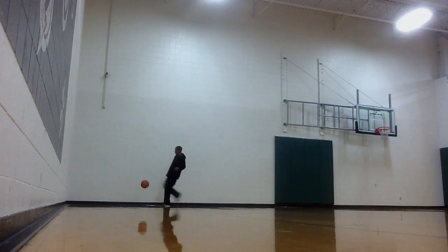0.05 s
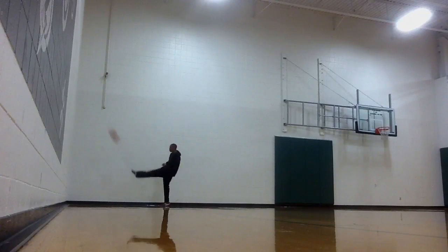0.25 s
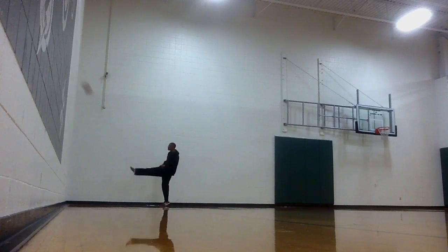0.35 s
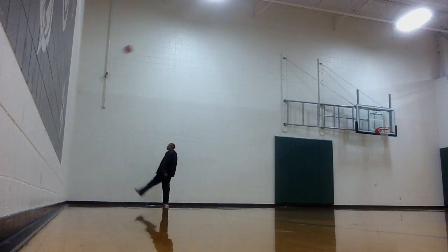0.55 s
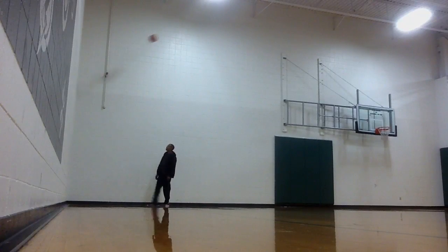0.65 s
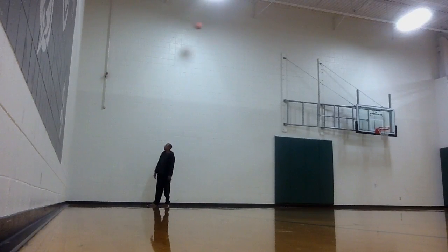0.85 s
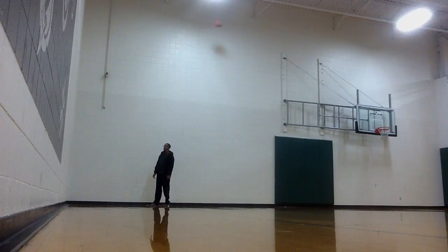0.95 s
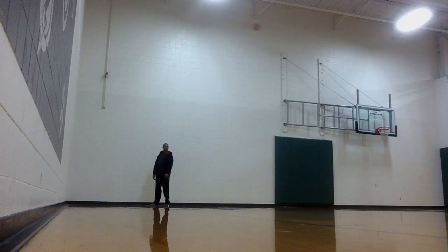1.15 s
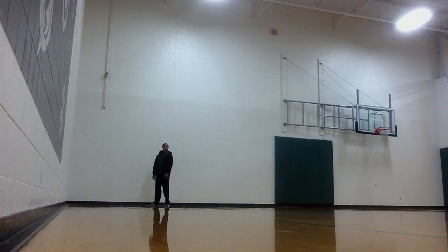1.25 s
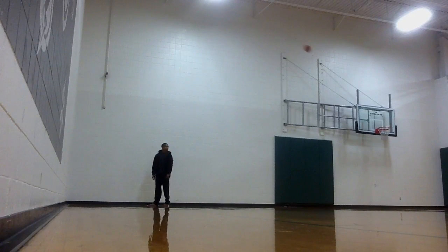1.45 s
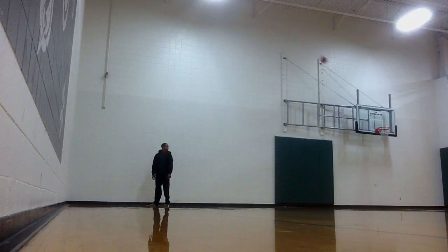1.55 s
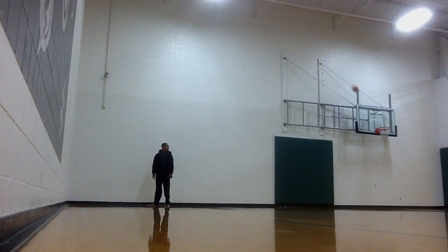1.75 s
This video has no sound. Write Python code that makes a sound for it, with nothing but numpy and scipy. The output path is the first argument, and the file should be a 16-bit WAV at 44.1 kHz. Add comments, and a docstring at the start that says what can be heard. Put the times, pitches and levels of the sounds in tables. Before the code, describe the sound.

A kicked ball thuds and rebounds around a large gym, each hit reverberating.

```python
"""A big, hard gym: a ball is kicked, slaps the side wall, clinks on metal high up, lands a distant blow.
Each blow is a crack and a low thump, with the ball's skin and air ringing.
Nearby walls echo it; the hall reverberates for seconds.
Underneath: ventilation and the dying wash of an earlier bounce."""
import sys
import numpy as np
from scipy import signal
from scipy.fft import rfft, irfft, next_fast_len
from scipy.io import wavfile
from scipy.ndimage import map_coordinates

SR = 44100
rng = np.random.default_rng(int(sys.argv[2]) if len(sys.argv) > 2 else 0)


def log_audio(samples):
    """Write samples as a 16-bit WAV file to the path given in sys.argv[1]."""
    # one column per channel
    frames = np.atleast_2d(samples).T
    # limit to full scale, then quantise
    limited = np.clip(frames, -1, 1)
    pcm = np.round(limited * 32767).astype(np.int16)
    wavfile.write(sys.argv[1], SR, pcm)


N = 79380
T = np.arange(N) / SR
FFT_SIZE = next_fast_len(2 * N)
HZ = np.fft.rfftfreq(FFT_SIZE, 1 / SR)

# hall decay (frequency [Hz], T60 [s])
HALL_T60 = [(80, 3.53), (200, 3.13), (550, 1.92), (1200, 2.77), (2500, 1.785), (4000, 1.383), (6500, 0.8),
            (10000, 0.52), (15000, 0.38)]
# back wall reflection (frequency [Hz], gain [dB])
BACK_WALL_GAIN = [(150, 3), (1500, -2), (3000, 0.5), (6000, -12), (15000, -5)]
# background spectra (frequency [Hz], relative level [dB])
VENT_SPECTRUM = [(25, -40), (50, -47), (110, 2), (200, 5.5), (500, -13.5), (1500, -19), (4000, -32),
                 (7000, -40), (15000, -41)]
WASH_SPECTRUM = [(40, -33), (75, -8), (125, 4), (190, 3), (400, -13), (600, -22.5), (1100, -19.5),
                 (2500, -16), (4200, -15.5), (6500, -17.5), (15000, -51)]
# modes of metal fitting, shoe knock, ball skin and air (frequency [Hz], level [dB], T60 [s])
METAL_MODES = [(3610, -4, 0.17), (3736, -12, 0.04), (3926, -0.5, 0.19), (4050, -1.5, 0.21),
               (4320, -0.5, 0.063), (4370, -14, .16), (4480, -6, 0.12), (4770, -3.5, 0.08),
               (4840, -3, 0.05)]
SHOE_MODES = [(1110, 9, 0.042), (3210, 1, 0.045), (4180, -2, 0.034), (4540, 2, 0.042)]
BALL_MODES = [(405, -5, 0.036), (657, -7, 0.068), (793, -1.5, 0.068), (955, 2, 0.06), (1125, -1, 0.05),
              (1268, -5, 0.055), (1590, -11, 0.055), (1730, -13, 0.05), (2640, -22, 0.4)]
# ball contacts (time [s], crack [dB], crack decay [s], thump [dB], thump pitch [Hz], thump delay [s],
# thump T60 [s], ring [dB], ring delay [s], scatter [dB], scatter peak [s], hall [dB], hall build-up [s])
BLOWS = [(0.2325, 2.5, 0.0013, -9, 153.5, 0.0001, 0.037, -31.5, 0.0003, -2.5, 0.0081, 9.5, 0.023),
         (0.4551, 3.5, 0.00045, -11, 180.5, 0.00797, 0.049, -24, 0.004023, 5, 0.0092, 16.5, 0.023),
         (0.7294, -8.5, 0.0015, -20, 119, 0.00075, 0.14, -46.5, 0.00179, -2.5, 0.005, 8.5, 0.0047),
         (1.385, -15.5, 0.0084, -25, 131.6, 0.03695, 0.21, -53, .004, -4, 0.02, 9, 0.05)]
# contact spectra (frequency [Hz], relative level [dB])
KICK_SPECTRUM = [(35, -51), (60, -24.5), (100, -1), (145, 6.5), (240, -5), (480, -9), (1000, -15.5),
                 (1650, -13.5), (2100, -20), (2700, -20), (3800, -29), (4800, -28), (5800, -40.5),
                 (10000, -39.5), (15000, -51)]
SLAP_SPECTRUM = [(35, -51), (65, -23), (110, 1), (170, 2.5), (260, -2), (380, -5), (530, -16), (850, -11.5),
                 (1400, -20), (2700, -16), (3550, -21.5), (4700, -18.5), (6500, -24), (11000, -28.5),
                 (15000, -35)]
CLINK_SPECTRUM = [(40, -27), (120, 1.5), (260, -0.5), (500, -12.5), (1500, -18.5), (3100, -20.5),
                  (3900, -6.5), (4600, -12.5), (5700, -20), (10000, -21), (15000, -36)]
FAR_SPECTRUM = [(40, -43), (75, -14), (135, 5), (260, -2.5), (560, -20.5), (1200, -16.5), (2600, -19),
                (4200, -24.5), (6000, -37.5), (10000, -42), (15000, -53)]
# tilt of crack and scatter against the hall (frequency [Hz], gain [dB])
KICK_TILT = [(150, -0.5), (330, 2.5), (1000, 0.5), (1650, 8.5), (2000, -8), (3200, 0.5), (4500, 6.5),
             (12000, 5)]
SLAP_TILT = [(150, -3), (450, 0.5), (1000, 3.5), (2400, 6), (3700, -3), (5000, 4.5), (12000, 8.5)]
CLINK_TILT = [(50, -19), (450, 5), (1500, -2), (4200, 0.5), (12000, 5.5)]
FAR_TILT = [(150, 6), (450, -1), (1000, -6), (2200, 2), (4500, 3.5), (12000, 3)]
# distinct reflections (delay [s], treble [dB], treble cutoff [Hz], bass [dB])
KICK_ECHOES = [(.022, -10, 12000, -6.5), (.055, -10, 1200, -17.5), (.069, -10, 7050, -36),
               (.079, -6, 2600, -9), (.112, -14, 6000, -18.5), (.152, -9.5, 1800, -8)]
SLAP_ECHOES = [(0.009, -24.5, 3000, -11.5), (.052, -17.5, 12100, -26), (.068, -8, 900, -7),
               (0.082, -11, 1000, -7), (.112, -22, 1000, -8.5), (0.149, -11.5, 5980, -17.5)]
CLINK_ECHOES = [(.0035, 5, 12000, -6), (0.026, -20, 10000, -3)]
FAR_ECHOES = [(0.022, 8, 6000, -18), (0.0525, 7, 1500, -14), (0.0687, -13, 1000, -9.5)]

NOISE_EVENNESS = 0.37
LUMPS_DB, LUMPS_RATE_HZ, LUMPS_FADE_S, LUMPS_BELOW_HZ = 5, 93, 0.27, 3700
SMEAR_PER_DELAY, SMEAR_ABOVE_HZ = 0.077, 510
BACK_WALL_DELAY_S = 0.00628
VENT_DB, WASH_DB, SHOE_DB = -42.5, 4, -34
METAL_DB, METAL_HALL_DB, METAL_STRIKE_DB, METAL_STRIKE_S = -38, 4.5, 4, 0.0028
THUMP_ATTACK_S, THUMP_HIGHPASS_HZ = 0.0024, 74
RING_ATTACK_S, RING_HIGHPASS_HZ, RING_HALL_DB = 0.0018, 298, -9
SMACK_DB, SMACK_S = 9, 0.004
BAND_LIMIT_HZ = 15450


def amp(db):
    """Decibels to gain."""
    return 10 ** (np.asarray(db) / 20)


def curve(points, hz):
    """Interpolate (frequency, value) points on a log frequency axis."""
    knots_hz, values = np.transpose(points)
    return np.interp(np.log(hz + 1), np.log(knots_hz + 1), values)


def unit_energy(x):
    """Scale to energy 1."""
    return x / np.sqrt(np.sum(x ** 2) + 1e-20)


def convolved(x, response):
    """Apply an impulse response."""
    return signal.fftconvolve(x, response)[:N]


def delayed(x, delay_s):
    """Shift later."""
    return np.pad(x, (max(round(delay_s * SR), 0), 0))[:N]


def filtered(x, cutoff_hz, kind, order=2):
    """Butterworth low-pass or high-pass."""
    return signal.lfilter(*signal.butter(order, min(cutoff_hz, SR / 2 - 1), kind, fs=SR), x)


def pulse(spectrum):
    """Minimum-phase pulse with the given spectrum."""
    cepstrum = irfft(np.log(amp(curve(spectrum, HZ))), FFT_SIZE)
    cepstrum[1:FFT_SIZE // 2] *= 2
    cepstrum[FFT_SIZE // 2 + 1:] = 0
    return irfft(np.exp(rfft(cepstrum)), FFT_SIZE)[:N]


def burst(decay_s):
    """Short noise puff, nearly flat spectrum."""
    envelope = np.exp(-T / decay_s)
    bins = rfft(rng.standard_normal(N) * envelope, FFT_SIZE)
    whitened = irfft(bins / (abs(bins) + 1e-12), FFT_SIZE)[:N]
    return unit_energy(whitened * np.sqrt(envelope))


def damped_modes(modes):
    """Decaying sines; levels vary about 1 dB per strike."""
    return sum(amp(db + rng.normal(0, 1) - 60 * T / t60_s) * np.sin(2 * np.pi * hz * T)
               for hz, db, t60_s in modes)


def even_noise(frame_samples):
    """White noise, level partly evened over time and frequency."""
    noise = rng.standard_normal(N)
    for _ in range(2):
        hz, _, bins = signal.stft(noise, SR, nperseg=frame_samples)
        evenness = NOISE_EVENNESS / (1 + hz[:, None] / 1000)
        band_mean = np.mean(abs(bins) ** (1 - evenness), axis=1, keepdims=True)
        evened = bins / (abs(bins) + 1e-12) ** evenness / band_mean
        noise = signal.istft(evened, nperseg=frame_samples)[1][:N]
    return noise / noise.std()


def ventilation():
    """Steady rumble, faint hiss."""
    white = rfft(rng.standard_normal(FFT_SIZE))
    air = irfft(white * amp(curve(VENT_SPECTRUM, HZ)), FFT_SIZE)[:N]
    return amp(VENT_DB) * air / air.std()


def hall(build_s):
    """Diffuse tail: builds up, lumpy at first below the treble; treble dies first."""
    hz, time_s, bins = signal.stft(even_noise(frame_samples=2048), SR, nperseg=512)
    lumps = map_coordinates(rng.standard_normal(N), [time_s * LUMPS_RATE_HZ], order=1)
    lumps_db = LUMPS_DB * lumps * np.exp(-time_s / LUMPS_FADE_S)
    lumps_db = lumps_db / (1 + (hz[:, None] / LUMPS_BELOW_HZ) ** 2)
    decay_db = 60 * time_s / curve(HALL_T60, hz)[:, None]
    tail = signal.istft(bins * amp(lumps_db - decay_db), SR, nperseg=512)[1][:N]
    return tail * (1 - np.exp(-T / build_s)) * np.sqrt(np.log(1e6) / (2 * SR))


def earlier_bounce():
    """Hall wash of a bounce 1/3 s before the start."""
    wash = signal.fftconvolve(unit_energy(pulse(WASH_SPECTRUM)), hall(build_s=0.02))
    return amp(WASH_DB) * wash[SR // 3:][:N]


def scatter(peak_s):
    """Dense first reflections from floor and corner."""
    return unit_energy(even_noise(frame_samples=512) * T / peak_s * np.exp(-T / peak_s))


def wall_echoes(x, echoes):
    """Sound plus echoes; later ones have more smeared treble."""
    bass = filtered(x, SMEAR_ABOVE_HZ, "low")
    treble = filtered(x, SMEAR_ABOVE_HZ, "high")
    for delay_s, treble_db, cutoff_hz, bass_db in echoes:
        smeared = convolved(treble, burst(SMEAR_PER_DELAY * delay_s))
        dulled = filtered(smeared, cutoff_hz, "low", order=1)
        x = x + delayed(amp(bass_db) * bass + amp(treble_db) * dulled, delay_s)
    return x


def back_wall(x):
    """Sound plus its return from a wall 1 m behind the listener: hollow comb."""
    mirror = amp(curve(BACK_WALL_GAIN, HZ)) * np.exp(-2j * np.pi * HZ * BACK_WALL_DELAY_S)
    return irfft(rfft(x, FFT_SIZE) * (1 + mirror), FFT_SIZE)[:N]


def metal_fitting(time_s):
    """Struck metal under the roof rings, hardest at onset."""
    strike = 1 + amp(METAL_STRIKE_DB) * np.exp(-T / METAL_STRIKE_S)
    tone = amp(METAL_DB) * strike * damped_modes(METAL_MODES)
    tail = amp(METAL_HALL_DB) * convolved(tone, hall(build_s=0.039))
    return delayed(back_wall(tone) + tail, time_s)


def shoe_knock(time_s):
    """Short knock of shoe on ball."""
    return delayed(amp(SHOE_DB) * damped_modes(SHOE_MODES), time_s)


def ball_thump(level_db, hz, t60_s):
    """Low damped swing; the ball radiates little deep bass."""
    envelope = amp(level_db - 60 * T / t60_s) * (1 - np.exp(-T / THUMP_ATTACK_S))
    return filtered(-envelope * np.sin(2 * np.pi * hz * T), THUMP_HIGHPASS_HZ, "high")


def ball_ring(level_db):
    """Skin and air modes; a hollow smack at onset as the skin springs back."""
    smack = (1 + amp(SMACK_DB) * np.exp(-T / SMACK_S)) * (1 - np.exp(-T / RING_ATTACK_S))
    return amp(level_db) * filtered(smack * damped_modes(BALL_MODES), RING_HIGHPASS_HZ, "high")


def ball_blow(row, spectrum, tilt, echoes):
    """One contact: crack, thump, ring and room response."""
    (time_s, crack_db, crack_s, thump_db, thump_hz, thump_delay_s, thump_t60_s,
     ring_db, ring_delay_s, scatter_db, scatter_peak_s, hall_db, build_s) = row
    contact = unit_energy(pulse(spectrum))
    tilted = convolved(contact, pulse(tilt))
    crack = amp(crack_db) * convolved(tilted, burst(crack_s))
    thump = delayed(ball_thump(thump_db, thump_hz, thump_t60_s), thump_delay_s)
    ring = delayed(ball_ring(ring_db), ring_delay_s)
    near = back_wall(wall_echoes(crack + thump + ring, echoes))
    early = amp(scatter_db) * convolved(tilted, scatter(scatter_peak_s))
    tail = convolved(amp(hall_db) * contact + amp(RING_HALL_DB) * ring, hall(build_s))
    return delayed(near + early + tail, time_s)


def scene():
    """Four ball contacts over the gym's background, mono."""
    kick, slap, clink, far = BLOWS
    ball = (ball_blow(kick, KICK_SPECTRUM, KICK_TILT, KICK_ECHOES)
            + ball_blow(slap, SLAP_SPECTRUM, SLAP_TILT, SLAP_ECHOES)
            + ball_blow(clink, CLINK_SPECTRUM, CLINK_TILT, CLINK_ECHOES)
            + ball_blow(far, FAR_SPECTRUM, FAR_TILT, FAR_ECHOES))
    shoe_and_metal = shoe_knock(time_s=kick[0]) + metal_fitting(time_s=clink[0])
    return (ball + shoe_and_metal + earlier_bounce() + ventilation())[None]


def record(dry):
    """Steep low-pass at the band limit."""
    rolloff = np.sqrt(1 + (HZ / BAND_LIMIT_HZ) ** 160)
    return irfft(rfft(dry, FFT_SIZE) / rolloff, FFT_SIZE)[:, :N]


dry = scene()
out = record(dry)
log_audio(out)
```